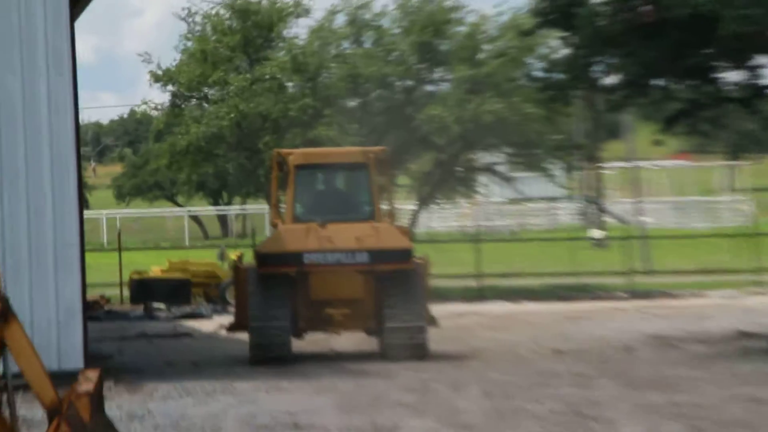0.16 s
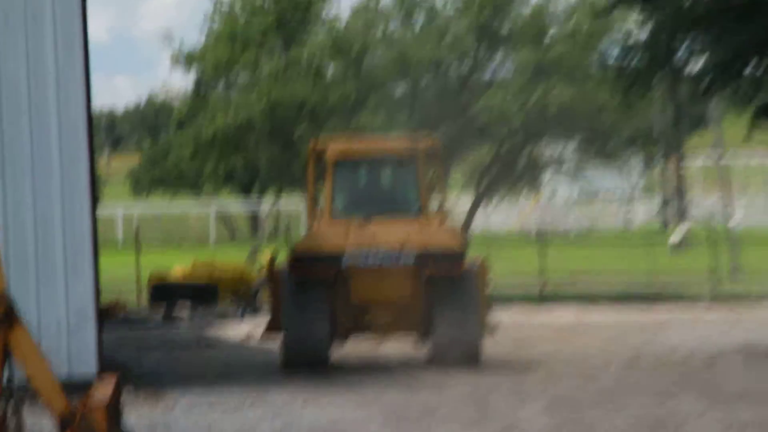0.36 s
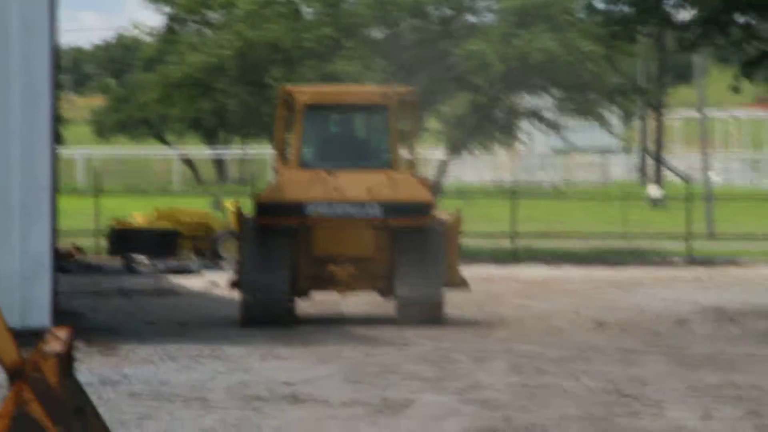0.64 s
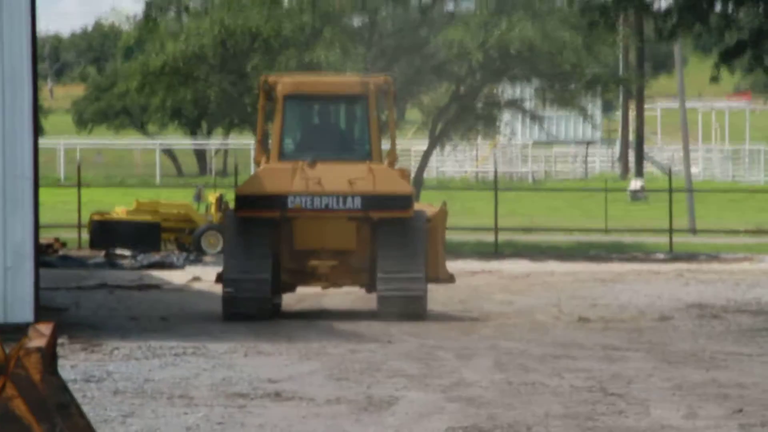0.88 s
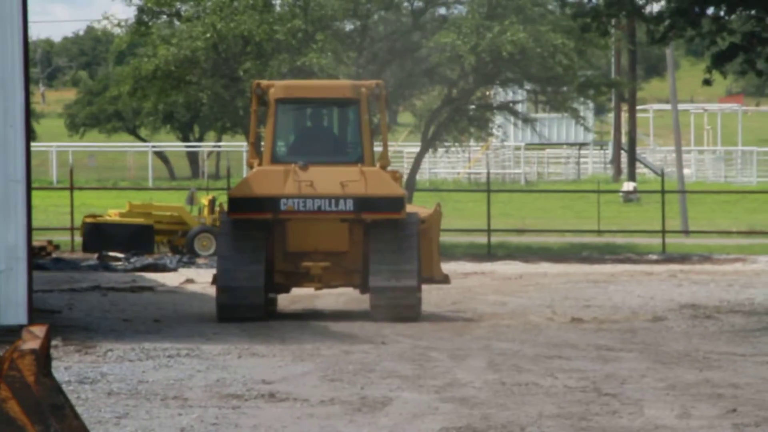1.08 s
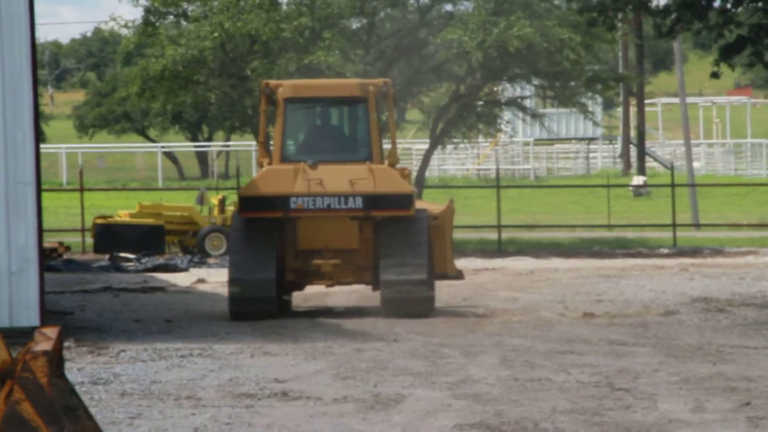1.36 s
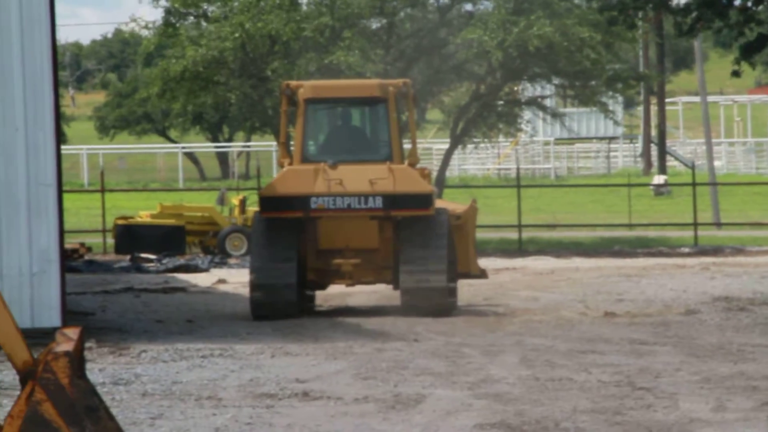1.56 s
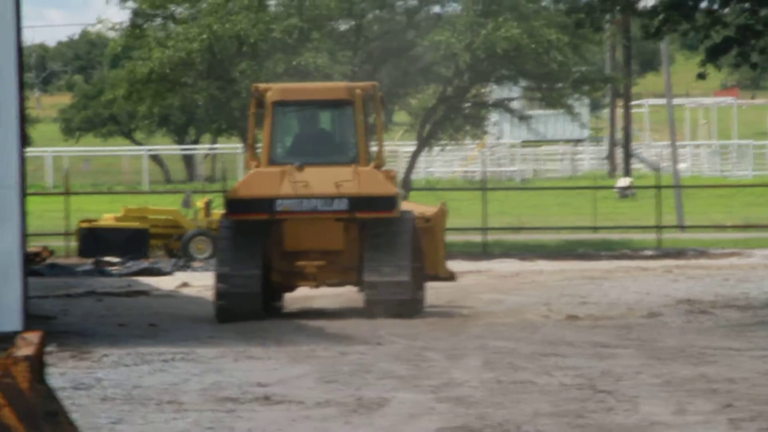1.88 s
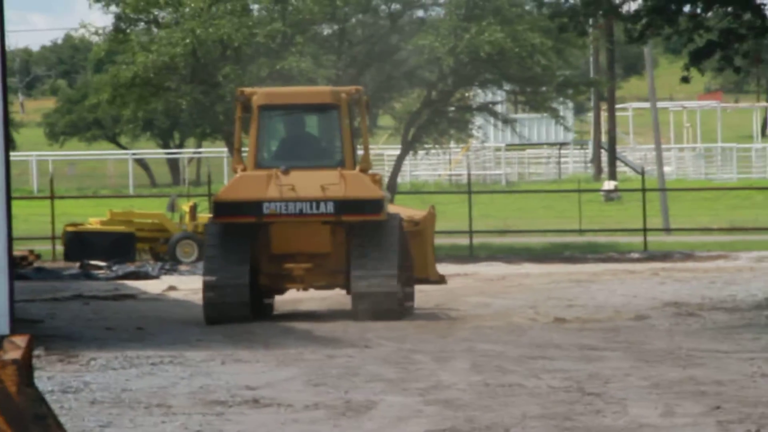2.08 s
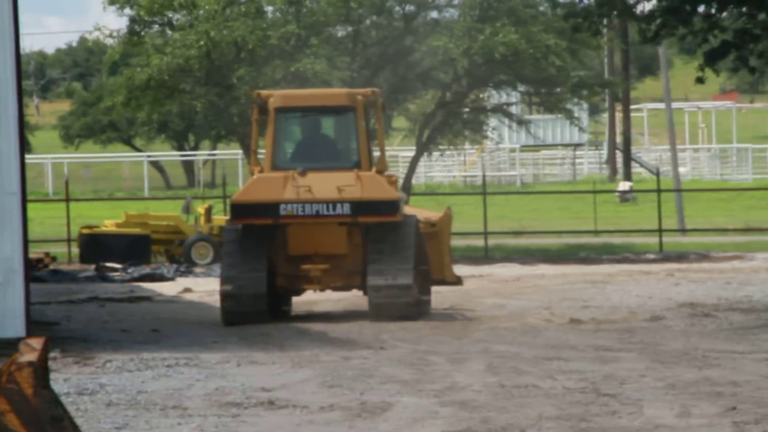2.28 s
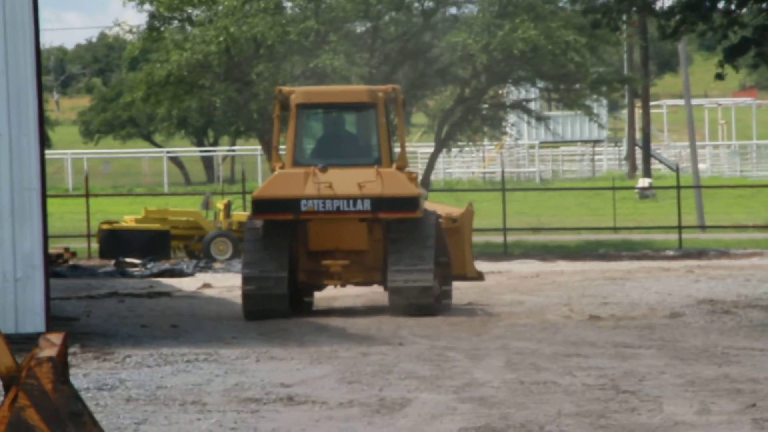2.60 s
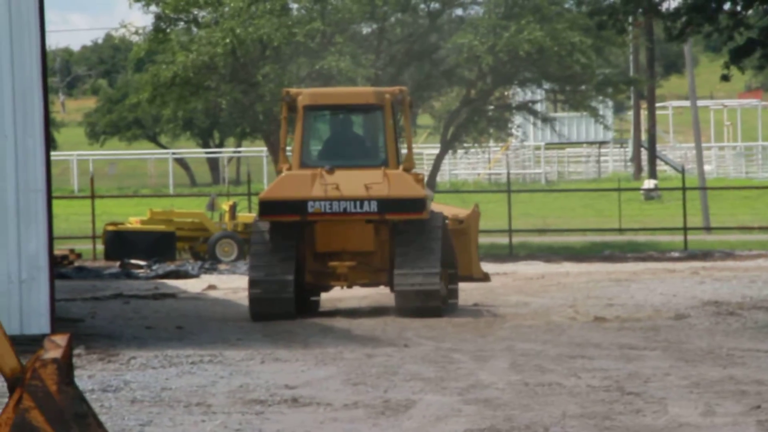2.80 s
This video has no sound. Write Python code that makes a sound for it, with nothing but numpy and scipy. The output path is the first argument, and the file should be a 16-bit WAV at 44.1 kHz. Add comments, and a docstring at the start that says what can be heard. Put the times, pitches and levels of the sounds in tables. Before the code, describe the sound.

A bulldozer's steel tracks clank rapidly and unevenly throughout, about eight hits a second, hardest around 0.3-0.75 s and again near 2.45 s. Beneath are boomy hull rumble, dull thuds, grinding, rattling links and a faint diesel, its drone swelling near 1.7 s. Short high squeals pierce at 0.3, 0.5, 1.3, 2.3 and strongest 2.55-2.7 s. Gravel cracks at 0.5 s and crunches around 2.4 s. Open yard, slight echo.

```python
"""Bulldozer on a gravel yard

One microphone position, three seconds; each source's nearness is set by its level alone.
The diesel and its drive are wavering sines; the hull is rumbling noise with low decaying thuds.
Tracks grind and rattle as shaped noise, and gravel crunches in tiny noise bursts and stone cracks.
Shoes clank every eighth of a second or so, with lesser strikes between: noise clash plus steel modes.
Dry pins squeal in short rough tones over a faint steel whistle, both trailing a yard echo."""
import sys
import numpy as np
from scipy import signal
from scipy.fft import rfft, irfft, next_fast_len
from scipy.io import wavfile
from scipy.ndimage import map_coordinates

SR = 44100
rng = np.random.default_rng(int(sys.argv[2]) if len(sys.argv) > 2 else 0)


def waveform_to_disk(signal):
    """Save audio, clipped to [-1, 1], as 16-bit WAV at the path in sys.argv[1]."""
    frames = np.transpose(np.atleast_2d(signal))
    scaled = np.clip(frames, -1, 1) * 32767
    samples = np.round(scaled).astype(np.int16)
    wavfile.write(sys.argv[1], SR, samples)


N = 129654  # samples

# Diesel harmonics: multiple of the firing rate, level/dB
ENGINE_HARMONICS = [(1, -37.5), (2, -42.5), (3, -36.5), (4, -37)]
# Drone of the drive: t/s, level/dB
DRONE_LEVEL = [(0, -40), (1.0, -30.5), (1.35, -32.5), (1.7, -21.5), (2.05, -30), (2.3, -29), (2.94, -33.5)]
FIRING_HZ, DRONE_HZ = 113.7, 210.6  # mean pitches

# Steady boom of the hull: t/s, level/dB
RUMBLE_LEVEL = [(0, -18), (.55, -19.5), (.75, -26), (.95, -26.5), (1.2, -21), (1.55, -21.5), (1.8, -18.5),
                (2.0, -18.5), (2.2, -18.5), (2.45, -21), (2.6, -26), (2.75, -28.5), (2.94, -21.5)]
# Colour of that boom: f/Hz, relative level/dB
RUMBLE_SPECTRUM = [(20, -85), (45, -30.5), (80, -15), (125, -8.5), (175, -5.5), (240, -4), (290, 2.5),
                   (335, -3), (385, -8), (460, -12), (560, -23), (800, -30.5), (2000, -68)]
# Rollers thud on the hull: t/s, level/dB before the rise and decay, f/Hz
THUDS = [(0.004, 2, 289), (0.148, -1, 281), (0.272, -3.5, 279), (0.394, -4, 296), (0.499, -1.5, 291),
         (0.575, -13, 275), (0.632, -7, 317), (0.752, -5.5, 258), (0.868, -9, 256), (1.007, -1.5, 293),
         (1.125, -5.5, 293), (1.246, -5.5, 276), (1.342, -3, 284), (1.479, -4.5, 295), (1.721, 0, 311),
         (1.842, -2, 334), (2.089, -5, 280), (2.171, -2, 219), (2.232, -5, 293), (2.47, -13, 280),
         (2.622, -7, 273), (2.835, -9.5, 296)]
# Dull low bumps: t/s, level/dB before the rise and decay, f/Hz
BUMPS = [(0.265, -30, 60), (1.215, -8.5, 115), (1.765, -18, 85), (1.812, -19, 62), (1.815, -7, 111),
         (2.765, -34, 105)]
THUD_RISE_S, THUD_T60_S = 0.0074, 0.082
BUMP_RISE_S, BUMP_T60_S = 0.0085, 0.073

# Grinding and rattling tracks together: t/s, level/dB
TRACK_LEVEL = [(0.0, -21.5), (0.36, -23), (0.59, -24.5), (0.81, -30), (0.97, -28.5), (1.37, -24.5),
               (1.75, -24.5), (2.34, -22), (2.62, -30.5), (2.94, -29)]
# Colour of the grinding chain: f/Hz, relative level/dB
GRIND_SPECTRUM = [(260, -20), (450, -3), (734, -7), (1080, -3.5), (1350, -6.5), (1660, -3.5), (1920, -12.5),
                  (2070, -7), (2820, -13.5), (3740, -15.5), (6970, -24.5), (7610, -31), (10500, -36),
                  (13400, -35), (15500, -56)]
# Colour of struck steel, for both clash and rattle: f/Hz, relative level/dB
CLASH_SPECTRUM = [(150, -20), (450, 3.5), (750, -15.5), (1050, 4), (1900, -3.5), (2800, -12), (3900, -7),
                  (5200, -13.5), (8000, -25.5), (12000, -30), (16000, -77)]
GRIND_DB, GRIND_FLUTTER_DB = -2, 1.5
RATTLE_PER_S, RATTLE_DB, RATTLE_SPREAD_DB, RATTLE_T60_S = 55, -7, 7.5, 0.077

# Fine gravel crunch: t/s, level/dB
CRUNCH_LEVEL = [(0, -51), (.6, -39), (.92, -47), (1.25, -36), (1.6, -39.5), (2.0, -41.5), (2.38, -30),
                (2.7, -45), (2.94, -34.5)]
# Stones crack under the shoes: t/s, level/dB, t60/s
STONES = [(0.418, -27, 0.17), (0.5032, -12.5, 0.0081), (0.734, -19, 0.079), (1.221, -23, 0.082),
          (1.264, -26, 0.055), (1.31, -25, .06), (1.36, -27, 0.067), (1.707, -28, 0.17), (2.061, -32, .05),
          (2.109, -26, 0.07), (2.149, -25, 0.088), (2.231, -24.5, 0.22), (2.318, -30, .07),
          (2.359, -20.5, 0.066), (2.408, -21.5, 0.12), (2.494, -22, 0.066)]
# Colour of broken stone: f/Hz, relative level/dB
STONE_SPECTRUM = [(800, -9), (2500, 15.5), (6000, 3), (11000, 0), (16000, -18)]

# Shoe clanks: t/s, level/dB, brightness/(dB per octave), ringing/dB, first push/dB
CLANKS = [(0.046, -12.5, -8, -9, -6), (0.177, -6.5, 3, -11, 5), (0.249, -13, -4, -13, -13),
          (0.335, -4, .5, -18.5, -4.5), (0.461, -1.5, -2, -17.5, -11), (0.594, 0, 0.5, -16, -2.5),
          (0.733, -2, 0.5, -11, 4), (0.865, -7, -0.5, -17, -1), (0.997, -5.5, -2.5, -12.5, -0.5),
          (1.121, -7.5, -1, -15.5, -8), (1.216, -11, -4.5, -10, -4), (1.251, -8, 1, -14.5, 6),
          (1.361, -22, -6, -9, -9), (1.405, -11.5, -2, -19, 3), (1.482, -13.5, -7, -15, -11),
          (1.496, -7.5, -1.5, -18.5, -4), (1.614, -13, -6.5, -13, -1), (1.701, -11.5, -6.5, -21, -2),
          (1.798, -23, 6, -27, 5), (1.851, -13, -6.5, -21, -14), (1.923, -18, -7, -21, 6),
          (1.968, -14, -7.5, -13, -15), (2.05, -7.5, -3.5, -15.5, -10), (2.182, -10, -0.5, -17.5, -4),
          (2.306, -11.5, 3, -25, -18), (2.448, -3.5, 1.5, -14, -3), (2.499, -6.5, 0.5, -21, -4),
          (2.617, -9.5, 2, -17.5, -4), (2.826, -12, 2.5, -13.5, 1), (2.843, -12, 4.5, -21, -3)]
# Long modes of a steel shoe, before scatter: f/Hz, level/dB, t60/s
SHOE_MODES = [(1073, -5.5, 0.12), (1447, -7, 0.13), (1687, -6, 0.22), (2080, -1, 0.2), (2422, -7, 0.33),
              (3270, -3, 0.11), (3510, -15.5, 0.39), (3655, -4, 0.14), (3970, -12.5, 0.1),
              (4060, -14, 0.28), (4300, -21, 0.35)]
# Decay of the many short modes: f/Hz, t60/s
CLASH_T60 = [(300, 0.089), (1500, 0.091), (4000, 0.21), (10000, 0.047)]
CLASH_DB, CLASH_ATTACK_S = -9, 0.0011
STRIKE_S, STRIKE_HZ = 0.00037, 1224  # width and mean pitch of the first push
MODE_SCATTER_DB, MODE_DETUNE = 2, 0.004  # spread from clank to clank; detune as a fraction of pitch

# Pin squeals: t/s at full strength, swell/s, hold/s, f/Hz, level/dB, octave overtone/dB
SQUEALS = [(0.255, .04, .012, 4650, -27, -22), (0.298, .02, .04, 4610, -16.5, -19),
           (0.503, .01, .02, 8820, -24, -40), (0.553, .02, .045, 8970, -24, -40),
           (0.644, .006, .005, 6800, -28, -30), (0.886, .008, .005, 7000, -37, -30),
           (1.278, .012, .01, 4690, -19, -28), (2.243, .008, .008, 10250, -32, -40),
           (2.286, .012, .008, 7172, -17, -32), (2.37, .007, .025, 10175, -31, -40),
           (2.86, .02, .08, 9750, -46, -40), (2.566, .02, .026, 4640, -13.5, -25),
           (2.636, .02, .008, 4630, -18, -15), (2.659, .006, .021, 4645, -12.5, -20),
           (2.725, .02, .018, 4690, -25, -24), (2.848, .01, .01, 4860, -25, -24)]
# Faint whistle of rubbing steel: t/s, level/dB
SING_LEVEL = [(0, -55), (.45, -49), (.9, -64), (1.5, -48), (1.65, -53), (1.82, -48), (2.2, -50.5),
              (2.94, -62)]
SQUEAL_BEND, SQUEAL_WAVER = 0.003, 0.006  # slow and fast, as fractions of pitch
SQUEAL_ROUGH_DB, SQUEAL_T60_S, THIRD_DB = 1.3, 0.04, -37
SING_HZ, SING_WIDTH_HZ = 10230, 100
SQUEAL_ECHO, YARD_T60_S = 0.45, 0.48  # echo gain, echo decay

TOP_HZ = 15750  # band limit of the microphone channel


def amp(db):
    """Decibels to gain."""
    return 10 ** (np.asarray(db) / 20)


def unit(x):
    """Scaled to rms 1."""
    return x / np.sqrt(np.mean(x ** 2) + 1e-20)


def along(points, hz):
    """(f/Hz, value) points read on a log frequency axis."""
    f, v = np.transpose(points)
    return np.interp(np.log(hz + 1), np.log(f + 1), v)


def curve(rows):
    """(t/s, value) points, one value per sample."""
    return np.interp(np.arange(N) / SR, *np.transpose(rows))


def wobble(rate):
    """A smooth random curve, rate knots a second."""
    knots = rng.standard_normal(N // 8)
    return map_coordinates(knots, [np.arange(N) * rate / SR], mode="wrap")


def filtered(x, response):
    """x times a response of frequency."""
    m = next_fast_len(len(x) + 8192)
    return irfft(rfft(x, m) * response(np.fft.rfftfreq(m, 1 / SR)), m)[:len(x)]


def coloured(x, spectrum):
    """x given a spectrum, at rms 1."""
    return unit(filtered(x, lambda hz: amp(along(spectrum, hz))))


def add(out, s, sound):
    """Mix a sound in at a time."""
    i = max(0, round(s * SR))
    out[i:i + len(sound)] += sound[:max(0, N - i)]


def turning(hz, waver, rate):
    """Phase of a pitch that wavers at random."""
    return 2 * np.pi * np.cumsum(hz * (1 + waver * wobble(rate))) / SR


def engine():
    """Firing harmonics of the diesel share one wavering phase; the drive drones apart from them."""
    phase = turning(FIRING_HZ, waver=0.0055, rate=14)
    firing = np.zeros(N)
    for multiple, db in ENGINE_HARMONICS:
        level = amp(db + 0.83 * wobble(17))
        firing += level * np.sin(round(multiple) * phase + rng.uniform(0, 2 * np.pi))
    drone_level = amp(curve(DRONE_LEVEL) + 3.5 * wobble(16))
    drone = drone_level * np.sin(turning(DRONE_HZ, waver=0.014, rate=18))
    return np.sqrt(2) * (firing + drone)  # makes the sine levels rms


def hull():
    """The hull booms steadily and thuds as rollers drop over the links; duller bumps come now and then."""
    rumble_level = amp(curve(RUMBLE_LEVEL) + 0.47 * wobble(24.43))
    out = rumble_level * coloured(rng.standard_normal(N), RUMBLE_SPECTRUM)
    t = np.arange(SR // 4) / SR
    for rows, rise, t60 in [(THUDS, THUD_RISE_S, THUD_T60_S), (BUMPS, BUMP_RISE_S, BUMP_T60_S)]:
        for s, db, hz in rows:
            shape = amp(db - 60 * t / t60) * (1 - np.exp(-(t / rise) ** 2))
            add(out, s, shape * np.sin(2 * np.pi * hz * t))
    return out


def bursts(per_s, spread_db, t60):
    """Noise in many small decaying bursts of random size; overlapping bursts add in power."""
    kicks = (rng.random(N) < per_s / SR) * amp(spread_db * rng.uniform(-1, 1, N))
    decay = amp(-60 * np.arange(SR // 4) / SR / t60)
    power = signal.fftconvolve(kicks ** 2, decay ** 2)[:N]
    return np.sqrt(np.abs(power)) * rng.standard_normal(N)


def links():
    """The chain grinds along as fluttering noise and its loose links rattle in bursts."""
    flutter = amp(GRIND_DB + GRIND_FLUTTER_DB * wobble(27.7))
    grind = flutter * coloured(rng.standard_normal(N), GRIND_SPECTRUM)
    knocks = bursts(RATTLE_PER_S, RATTLE_SPREAD_DB, RATTLE_T60_S)
    rattle = amp(RATTLE_DB) * coloured(knocks, CLASH_SPECTRUM)
    return amp(curve(TRACK_LEVEL)) * (grind + rattle)


def gravel():
    """Many small grains crunch, and single stones crack as decaying noise."""
    crunch = coloured(bursts(per_s=220, spread_db=5, t60=0.053), STONE_SPECTRUM)
    out = amp(curve(CRUNCH_LEVEL)) * crunch
    t = np.arange(SR // 8) / SR
    for s, db, t60 in STONES:
        crack = coloured(rng.standard_normal(len(t)), STONE_SPECTRUM)
        add(out, s, amp(db - 60 * t / t60) * crack)
    return out


def shoe_clash(t, tilt):
    """Many short modes of struck steel: noise whose bands each die at their own rate."""
    noise = coloured(rng.standard_normal(len(t)), CLASH_SPECTRUM)
    hz, when, bands = signal.stft(noise, SR, nperseg=128)
    decay = amp(-60 * when / along(CLASH_T60, hz)[:, None])
    return signal.istft(bands * tilt(hz)[:, None] * decay, SR, nperseg=128)[1][:len(t)]


def shoe_ring(t, tilt):
    """The few long modes of a shoe, each a decaying sine with scattered level and pitch."""
    ring = np.zeros(len(t))
    for f, db, t60 in SHOE_MODES:
        level = tilt(f) * amp(db + rng.normal(0, MODE_SCATTER_DB) - 60 * t / t60)
        cycles = f * rng.normal(1, MODE_DETUNE) * t + rng.random()
        ring += level * np.sin(2 * np.pi * cycles)
    return ring


def clanks():
    """Each shoe strikes: one hard push, a clash of many short modes, then its few long ones."""
    out, t = np.zeros(N), np.arange(SR // 2) / SR
    for s, db, bright_db, ring_db, strike_db in CLANKS:
        # brightness pivots at 1800 Hz and is level below 500 Hz
        tilt = lambda hz: amp(bright_db * np.log2(np.maximum(hz, 500) / 1800))
        clash = amp(CLASH_DB) * shoe_clash(t, tilt)
        ring = amp(ring_db) * shoe_ring(t, tilt)
        body = (clash + ring) * (1 - np.exp(-t / CLASH_ATTACK_S))
        push = np.exp(-(t / STRIKE_S - 1) ** 2)
        strike = push * np.sin(2 * np.pi * STRIKE_HZ * rng.normal(1, 0.077) * t)
        add(out, s, amp(db) * (body + amp(strike_db) * strike))
    return out


def whistle():
    """Rubbing steel sings faintly: noise through one narrow resonance."""
    resonance = lambda hz: 1 / (1 + ((hz - SING_HZ) / SING_WIDTH_HZ) ** 2)
    return amp(curve(SING_LEVEL)) * unit(filtered(rng.standard_normal(N), resonance))


def yard_echo(x):
    """The yard's echo: sound smeared through a decaying tail of noise."""
    t = np.arange(SR // 2) / SR
    tail = rng.standard_normal(len(t)) * amp(-60 * t / YARD_T60_S)
    return signal.fftconvolve(x, tail / np.linalg.norm(tail))[:N]


def squeals():
    """Dry pins stick and slip: a rough tone swells, holds and rings out, beating against its echoes."""
    out, now = np.zeros(N), np.arange(N) / SR
    for s, swell, hold, hz, db, octave_db in SQUEALS:
        t = now - s
        rise = np.exp(-(np.minimum(t, 0) / swell) ** 2)
        fall = amp(-60 * np.maximum(t - hold, 0) / SQUEAL_T60_S)
        phase = turning(hz * (1 + SQUEAL_BEND * wobble(50)), SQUEAL_WAVER, rate=400)
        tone = np.zeros(N)
        for k, level in enumerate([0, octave_db, THIRD_DB], 1):
            if k * hz < TOP_HZ:
                tone += amp(level) * np.sin(k * phase)
        out += amp(db + SQUEAL_ROUGH_DB * wobble(130)) * rise * fall * tone
    out += whistle()
    return out + SQUEAL_ECHO * yard_echo(out)


def scene():
    """The whole machine, heard from one spot."""
    return (engine() + hull() + clanks() + links() + gravel() + squeals())[None]


def record(dry):
    """The microphone channel clips at full scale, then keeps nothing above its band limit."""
    return np.array([filtered(np.clip(x, -1, 1), lambda hz: hz < TOP_HZ) for x in dry])


dry = scene()
out = record(dry)
waveform_to_disk(out)
```